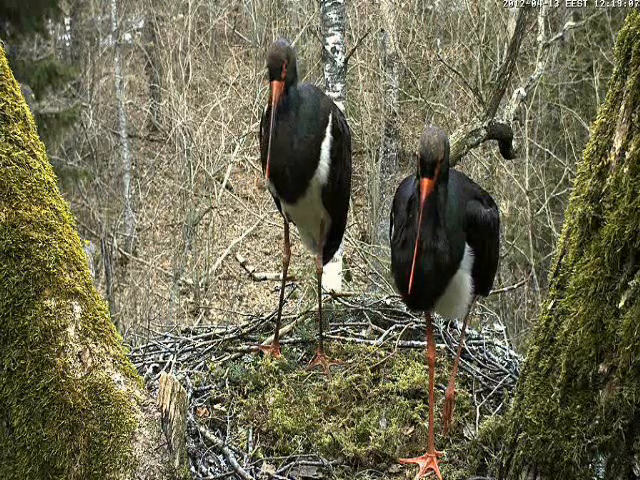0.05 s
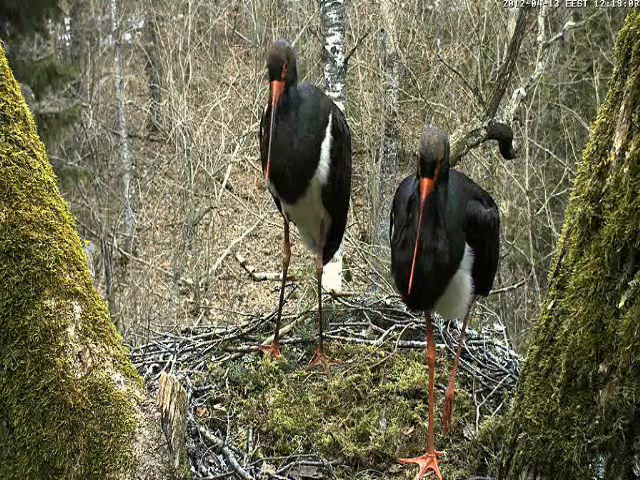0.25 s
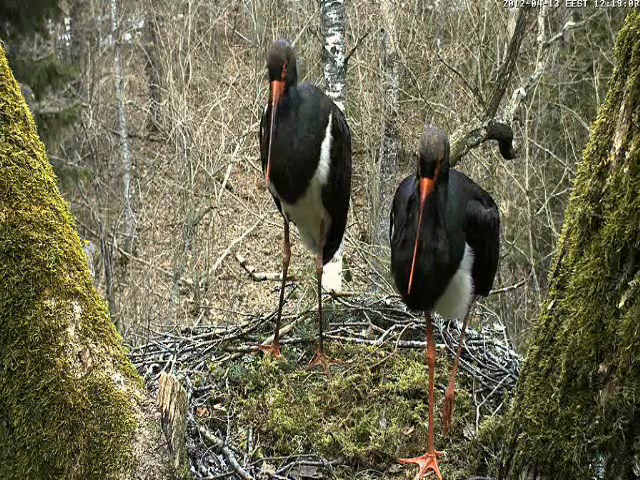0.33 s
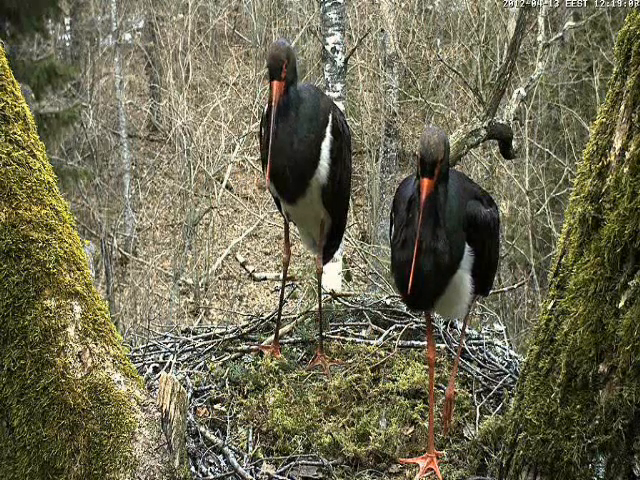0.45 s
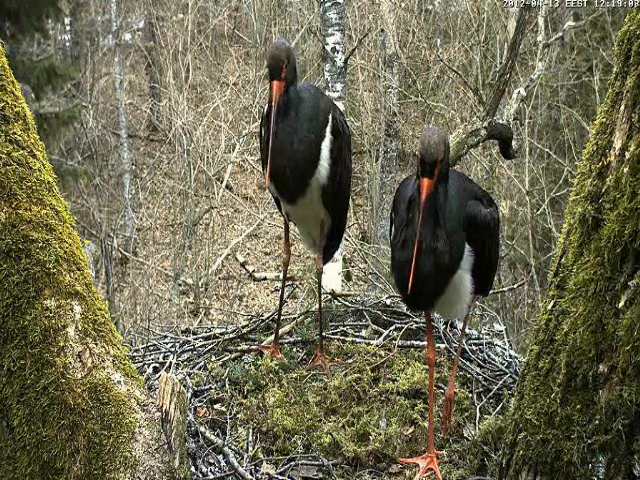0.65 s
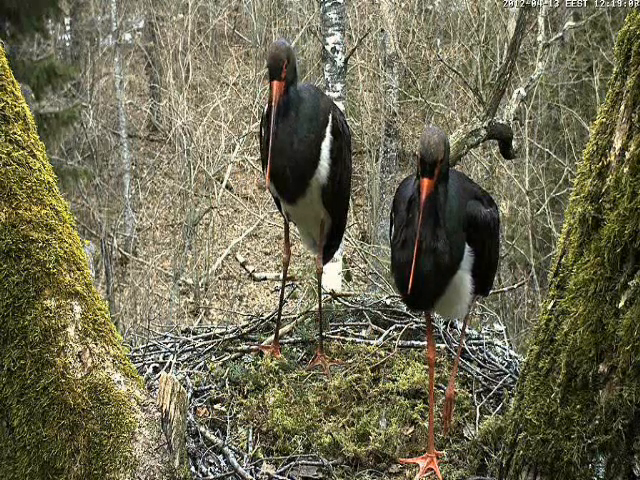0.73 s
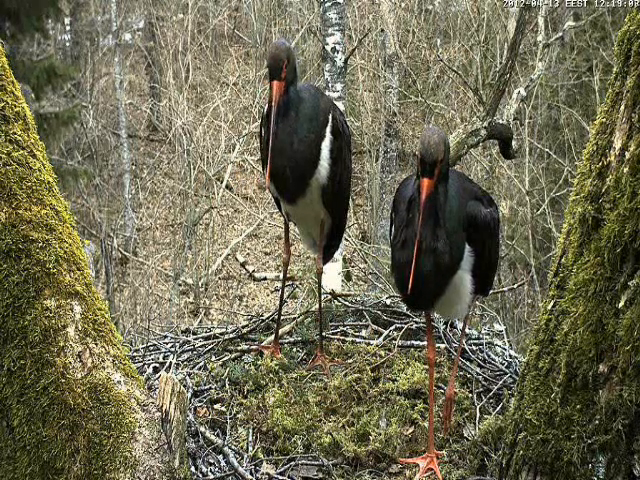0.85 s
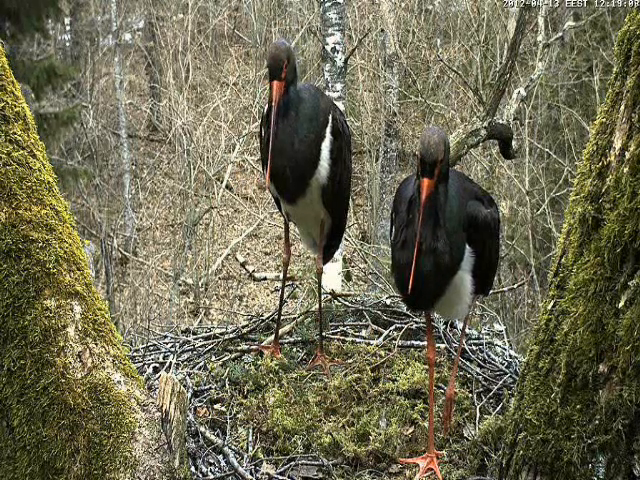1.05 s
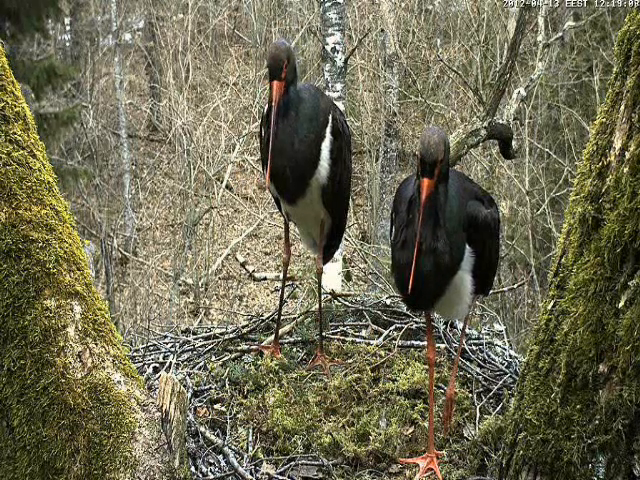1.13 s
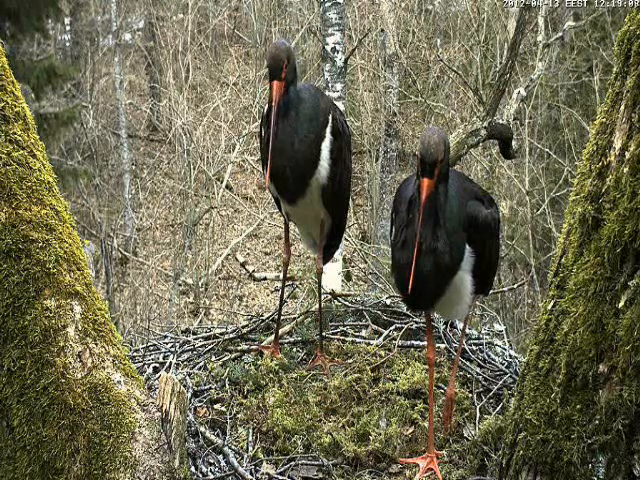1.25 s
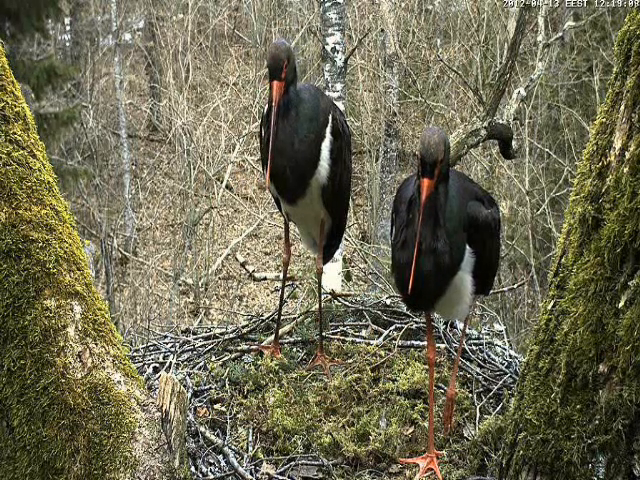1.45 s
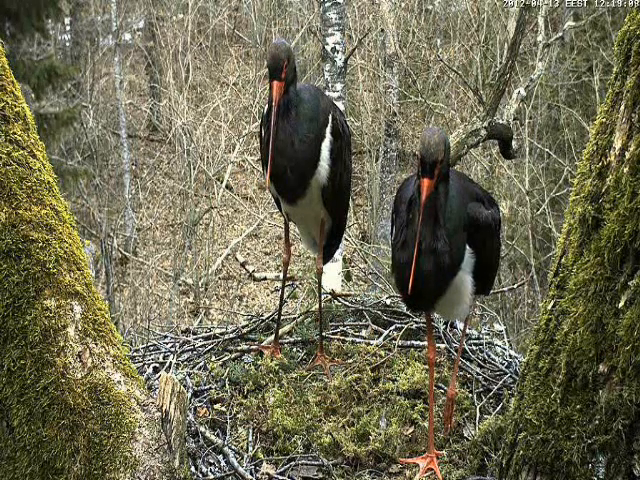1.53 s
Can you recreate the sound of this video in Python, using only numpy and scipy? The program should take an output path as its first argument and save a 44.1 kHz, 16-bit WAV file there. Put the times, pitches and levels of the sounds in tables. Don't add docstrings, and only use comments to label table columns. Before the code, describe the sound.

A distant crane-like bird bugles once, its hoarse held note echoing through a quiet, breezy wood

```python
import sys
import numpy as np
from scipy import signal
from scipy.fft import rfft, irfft, next_fast_len
from scipy.io import wavfile
from scipy.ndimage import uniform_filter1d, map_coordinates

SR = 44100
rng = np.random.default_rng(int(sys.argv[2]) if len(sys.argv) > 2 else 0)


def decibels_to_gain(level_db):
    exponent = np.asarray(level_db, float) / 20
    return 10 ** exponent


def store_wav(level_fs):
    pcm = np.round(np.clip(np.atleast_2d(level_fs), -1, 1) * 32767)
    wavfile.write(sys.argv[1], SR, pcm.T.astype(np.int16))


N = 70560

# t/s, level/dB
WIND_STRENGTH = [
    (0, -58.5),
    (0.169, -60.5),
    (0.228, -55),
    (0.603, -56),
    (1.0, -56.5),
    (1.361, -56.5),
    (1.462, -60.5),
    (1.6, -60.5),
]
# f/Hz, density/dB
BRANCH_SPECTRUM = [(20, -13.5), (60, -15), (100, -13.5), (165, -7), (300, -6), (600, -10.5), (1300, -17),
                   (3500, -27.5)]
# f/Hz, density/dB
LEAF_SPECTRUM = [(300, -24.5), (800, 0), (1400, -2.5), (2100, 1), (2700, -1.5), (3600, -8)]
# centre t/s, level/dB, f/Hz, length/s
CHIPS = [(0.036, -61, 2060, 0.01), (0.996, -55, 2463, .02), (1.059, -56.5, 2480, 0.014),
         (1.12, -62, 3486, 0.011), (1.135, -59, 3480, 0.013), (1.156, -64, 3466, 0.022),
         (1.219, -52.5, 2465, 0.012), (1.235, -55.5, 2490, 0.011), (1.296, -52.5, 2425, 0.0098),
         (1.31, -51, 2400, 0.011), (1.359, -56, 2800, .008), (1.384, -56, 2500, .006),
         (1.395, -48, 2520, .007), (1.406, -44, 2530, .012), (1.475, -75, 2522, .012)]
# centre t/s, length/s, level/dB, f/Hz
CLUCKS = [
    (0.151, .014, -53, 703),
    (0.199, 0.013, -41.5, 840),
    (0.215, .02, -48, 860),
    (0.258, .03, -58.5, 1095),
]
# centre t/s, length/s, level/dB, f/Hz
FUNDAMENTAL_SWELLS = [(.252, 0.026, -38, 860), (.278, 0.035, -35.5, 876.5), (.303, .016, -44.5, 881.6),
                      (.585, 0.033, -36.5, 861.6), (.606, 0.019, -36, 864.7), (.622, 0.015, -38, 881),
                      (.645, 0.021, -45, 857.6), (.667, 0.026, -38, 881.8), (.685, 0.024, -37, 891.2),
                      (.703, 0.014, -40, 878.8), (.73, 0.033, -39, 882.7), (.757, 0.024, -39, 874.5),
                      (.776, .024, -34, 871.3), (.803, .018, -41, 876.2), (.824, 0.013, -44, 879.3),
                      (.84, 0.012, -40, 879), (.862, 0.019, -49.5, 875), (.9, 0.016, -43.5, 877.4),
                      (.921, 0.0091, -51, 873), (.943, 0.023, -41, 886.7), (.968, 0.028, -38.5, 892.4),
                      (.993, 0.029, -39.5, 870.8), (1.013, 0.014, -52, 877.5), (1.037, 0.016, -42.5, 874.3),
                      (1.05, 0.012, -50.5, 878), (1.07, 0.022, -44.5, 876.8), (1.091, 0.024, -45.5, 891.3),
                      (1.121, 0.018, -48.5, 876), (1.147, .025, -52, 875.3), (1.168, 0.015, -44, 881.4),
                      (1.193, 0.033, -43.5, 894), (1.223, 0.017, -48.5, 890), (1.24, 0.017, -49, 867.4),
                      (1.257, .02, -54, 875.3), (1.275, .024, -48, 868.4), (1.308, 0.046, -48, 895),
                      (1.343, 0.019, -47.5, 893.6), (1.368, 0.024, -56, 883), (1.4, 0.041, -55.5, 884),
                      (1.437, 0.023, -55, 870.6), (1.466, 0.014, -51, 860), (1.518, 0.03, -57, 877),
                      (1.553, .03, -61, 887), (1.588, 0.016, -55, 885)]
# centre t/s, length/s, level/dB, f/Hz
OCTAVE_SWELLS = [(.243, 0.012, -51.5, 1723), (.28, 0.054, -48.5, 1780), (.307, 0.019, -48, 1747),
                 (.602, 0.019, -41, 1759), (.63, 0.033, -50.5, 1777), (.652, 0.02, -47.5, 1765),
                 (.683, 0.029, -43, 1785), (.725, 0.051, -45.5, 1780), (.762, .028, -45.5, 1725),
                 (.82, 0.047, -55, 1781), (.86, 0.076, -55, 1778), (.915, .05, -61, 1767),
                 (.975, .04, -51.5, 1810), (1.055, .06, -62.5, 1768), (1.14, 0.079, -57.5, 1790),
                 (1.215, 0.075, -58.5, 1786), (1.295, 0.064, -59, 1780)]
# centre t/s, length/s, level/dB, f/Hz
TWELFTH_SWELLS = [
    (.31, 0.042, -63, 2632),
    (.365, 0.041, -64.5, 2691),
    (.425, 0.038, -54.5, 2683),
    (.465, .03, -61, 2666),
    (.51, .04, -64, 2640),
    (.572, 0.023, -60, 2600),
    (.63, 0.048, -65, 2640),
]
# centre t/s, length/s, level/dB, f/Hz
SAG_SWELLS = [
    (.645, .03, -54.5, 790),
    (.75, 0.019, -44, 788),
    (.775, 0.024, -48.5, 760),
    (.805, 0.027, -55.5, 768),
    (.835, .04, -53, 763.3),
    (.865, 0.033, -54.5, 739.4),
    (.892, 0.026, -52, 746),
    (.94, 0.037, -57, 764),
    (.99, 0.021, -51.5, 764),
    (1.04, 0.036, -62, 798),
]
# t/s, fundamental f/Hz, fundamental level/dB, octave level/dB
BUGLE_NOTE = [
    (.322, 879, -40, -49.5),
    (.37, 897.6, -41, -50),
    (0.389, 903.4, -40.5, -47),
    (0.404, 900.5, -34, -43),
    (.44, 896.4, -38, -45.5),
    (0.504, 893, -37, -45),
    (.562, 865.7, -53, -48),
    (.61, 810.6, -49, -59.5),
    (0.706, 748.4, -49, -55),
]
# f/Hz, T60/s
WOOD_T60 = [(500, 1.6), (750, 1.8), (900, 3), (1800, 2.2), (3000, 1.6)]

ROLL_HZ, WAVER_HZ = 25, 2.5
HOARSE_DB, OCTAVE_HOARSE_DB = -16.5, -16


def unit(x):
    return x / np.sqrt(np.mean(x ** 2) + 1e-20)


def along(points, hz):
    f, v = np.transpose(points)
    return np.interp(np.log(hz + 1), np.log(f + 1), v)


def wobble(rate):
    knots = rng.standard_normal(int(N * 200 / SR) + 4)
    return map_coordinates(knots, [np.arange(N) * min(rate, 200) / SR])


def filtered(x, response):
    m = next_fast_len(N + SR // 2)
    return irfft(rfft(x, m) * response(np.fft.rfftfreq(m, 1 / SR)), m)[:N]


def tone(hz):
    return 2 * np.pi * np.cumsum(hz) / SR


def hump(centre, length):
    t = np.arange(N) / SR
    return np.cos(np.pi * np.clip((t - centre) / (1.5 * length), -.5, .5)) ** 2


def rush(spectrum):
    patchy_db = 1.6
    z = signal.stft(rng.standard_normal(N), nperseg=512)[2]
    field = uniform_filter1d(rng.standard_normal(z.shape), 6, 0)
    field = uniform_filter1d(field, 10, 1)
    patchy = signal.istft(z * decibels_to_gain(patchy_db * unit(field)), nperseg=512)[1][:N]
    return unit(filtered(patchy, lambda hz: decibels_to_gain(along(spectrum, hz))))


def wind():
    branch_db, gust_db, flutter_db = 1.5, .6, 2.1
    leaf_db, leaf_follow = -54.5, 0.47
    s, db = np.transpose(WIND_STRENGTH)
    strength_db = np.interp(np.arange(N) / SR, s, db)
    branches = decibels_to_gain(strength_db + branch_db + gust_db * wobble(7)) * rush(BRANCH_SPECTRUM)
    rustle_db = leaf_db + leaf_follow * (strength_db - strength_db.mean())
    rustle_db = rustle_db + gust_db * wobble(5.8) + flutter_db * wobble(70)
    return branches + decibels_to_gain(rustle_db) * rush(LEAF_SPECTRUM)


def chips():
    waver_hz, scratch_db = 51, -6
    scratch_hz, scratch_wide_hz = 2400, 1120
    noise = rng.standard_normal(N)
    scratch = unit(filtered(noise, lambda hz: np.exp(-((hz - scratch_hz) / scratch_wide_hz) ** 2)))
    waver = waver_hz * wobble(200)
    out = np.zeros(N)
    for s, db, pitch, length in CHIPS:
        pulse = np.sqrt(2) * hump(s, length) * np.sin(tone(pitch + waver))
        breath_db = scratch_db - (db + 55) / 2
        breath = decibels_to_gain(breath_db) * hump(s + .004, 2 * length) * scratch
        out += decibels_to_gain(db) * (pulse + breath)
    return out


def whistle():
    start_s, level_db, pitch_hz, drop_hz, settle_s = 1.515, -63.5, 3225, 300, .018
    u = np.clip(np.arange(N) / SR - start_s, 0, None)
    pitch = pitch_hz + drop_hz * np.exp(-u / settle_s) + 500 * u
    level = decibels_to_gain(level_db + 1.6 * wobble(90)) * np.clip(u / .008, 0, 1)
    return level * np.sqrt(2) * np.sin(tone(pitch))


def hoarse(phase, rasp_db):
    under_hz, over_hz, over_db, rate = 55, 60, -25, 100

    def rasp(hz):
        envelope = wobble(rate) + 1j * wobble(rate)
        return envelope * np.exp(2j * np.pi * hz * np.arange(N) / SR)

    sides = decibels_to_gain(rasp_db) * rasp(-under_hz) + decibels_to_gain(over_db) * rasp(over_hz)
    return np.imag(np.exp(1j * phase) * (1 + sides))


def strand(rows, rasp_db, octave_db=-60):
    roll_db = -0.08
    s, _, _, pitch = np.transpose(rows)
    phase = tone(np.interp(np.arange(N) / SR, s, pitch) + WAVER_HZ * wobble(40))
    level = np.sqrt(2) * sum(decibels_to_gain(db) * hump(at, length) for at, length, db, _ in rows)
    octave = decibels_to_gain(octave_db + 2 * wobble(2 * ROLL_HZ)) * hoarse(2 * phase, rasp_db + 4)
    return level * (decibels_to_gain(roll_db * wobble(2 * ROLL_HZ)) * hoarse(phase, rasp_db) + octave)


def clucks():
    return sum(strand([row], HOARSE_DB, octave_db=-14) for row in CLUCKS)


def returns():
    held = strand(FUNDAMENTAL_SWELLS, HOARSE_DB - 3)
    held = held + strand(OCTAVE_SWELLS, OCTAVE_HOARSE_DB + 4) + strand(TWELFTH_SWELLS, -4)
    return held + strand(SAG_SWELLS, -12, octave_db=-7.5)


def bugle():
    attack_s, release_s, roll_db = .008, .03, 2.1
    twelfth_peak_db, twelfth_grows = -66, 1.5
    t = np.arange(N) / SR
    s, *cols = np.transpose(BUGLE_NOTE)
    pitch, low_db, octave_db = [np.interp(t, s, c) for c in cols]
    rise = np.clip((t - s[0]) / attack_s + 1, 0, 1)
    fall = np.clip((s[-1] - t) / release_s + 1, 0, 1)
    phase = tone(pitch + WAVER_HZ * wobble(40))
    effort_db = (low_db - low_db.max() + octave_db - octave_db.max()) / 2
    twelfth_db = twelfth_peak_db + twelfth_grows * effort_db + 1.5 * wobble(ROLL_HZ)
    partials = [(low_db, HOARSE_DB), (octave_db, OCTAVE_HOARSE_DB), (twelfth_db, -9)]
    note = np.zeros(N)
    for harmonic, (db, rasp_db) in enumerate(partials, 1):
        rolled = decibels_to_gain(db + roll_db * wobble(2 * ROLL_HZ))
        note += rolled * hoarse(harmonic * phase, rasp_db)
    return np.sqrt(2) * rise * fall * note


def wood(x, t60):
    hz, t, z = signal.stft(rng.standard_normal(N), SR, nperseg=256)
    decay = decibels_to_gain(-60 * t / t60(hz)[:, None])
    tail = signal.istft(z * decay, SR, nperseg=256)[1]
    tail = filtered(tail[:N], lambda f: f < 4000)
    return signal.fftconvolve(x, tail / np.linalg.norm(tail))[:N]


def scene():
    far_db, far_delay_s, near_db, near_t60_s = -22, .3, -19, .3
    air = wind()
    birds = chips() + whistle()
    lead_in_and_echoes = clucks() + returns()
    call = bugle()
    late_call = np.pad(call, (round(far_delay_s * SR), 0))[:N]
    far = decibels_to_gain(far_db) * wood(late_call, lambda hz: along(WOOD_T60, hz))
    direct = call + lead_in_and_echoes + birds
    near = decibels_to_gain(near_db) * wood(direct, lambda hz: near_t60_s + 0 * hz)
    return (direct + far + near + air)[None]


def roll_off(x):
    return signal.sosfilt(signal.butter(12, 12800, fs=SR, output="sos"), x)


def record(dry):
    edge_hz, edge_db_per_khz = 3520, 70
    hiss_db, hiss_from_hz, hiss_patchy_db = -82, 4490, 3.8
    voice = filtered(dry[0], lambda hz: decibels_to_gain(-edge_db_per_khz * np.clip(hz - edge_hz, 0, None) / 1000))
    z = signal.stft(rng.standard_normal(N), nperseg=2048)[2]
    field = uniform_filter1d(rng.standard_normal(z.shape), 5, 0)
    field = uniform_filter1d(field, 3, 1)
    strips = signal.istft(z * decibels_to_gain(hiss_patchy_db * unit(field)), nperseg=2048)[1][:N]
    hiss = filtered(strips, lambda hz: np.clip((hz - hiss_from_hz) / 300 + 1, 0, 1) * (hz < 13000))
    mix = (voice + decibels_to_gain(hiss_db) * unit(hiss))[None]
    return roll_off(mix)


dry = scene()
out = record(dry)
store_wav(out)
```